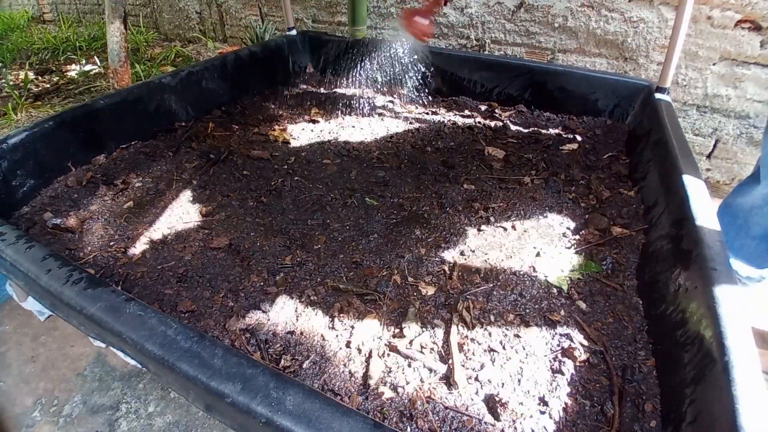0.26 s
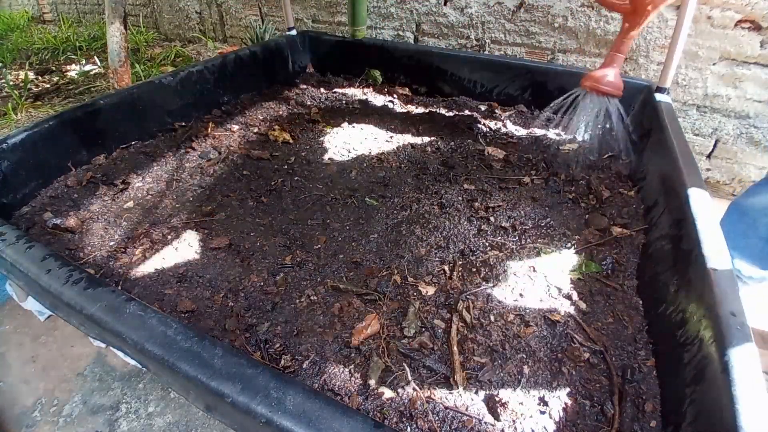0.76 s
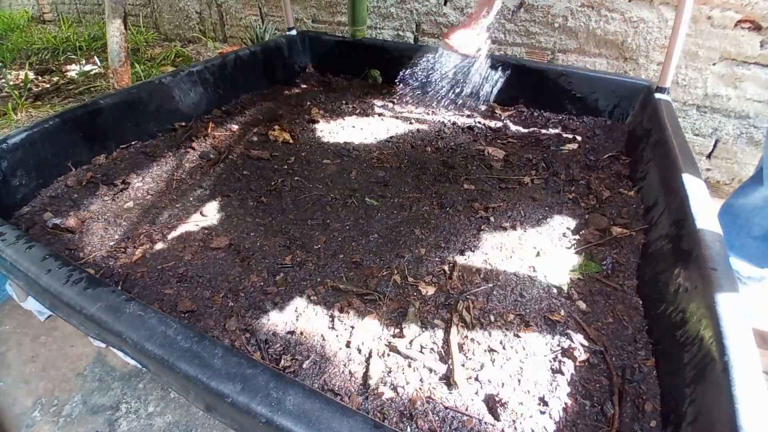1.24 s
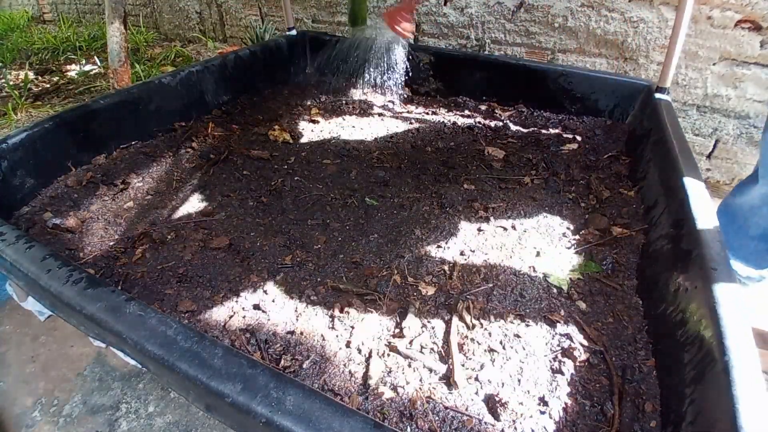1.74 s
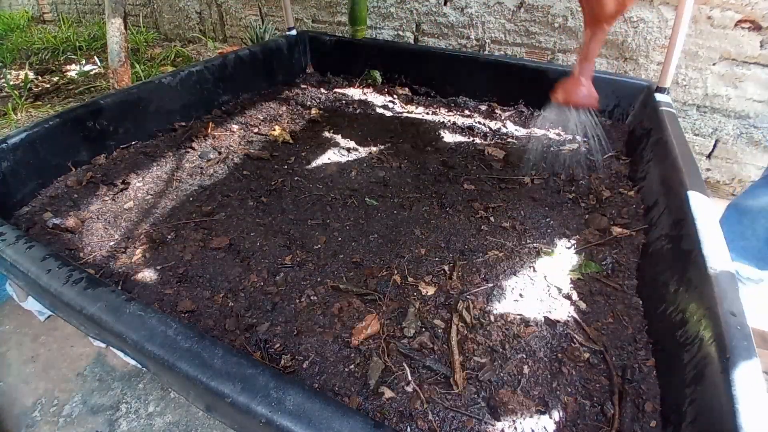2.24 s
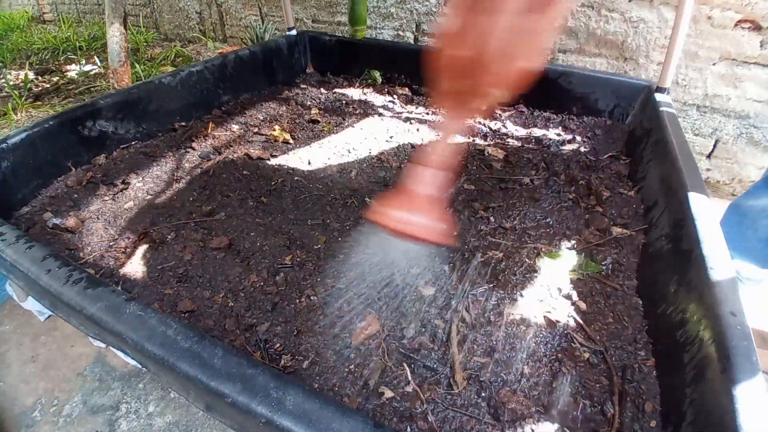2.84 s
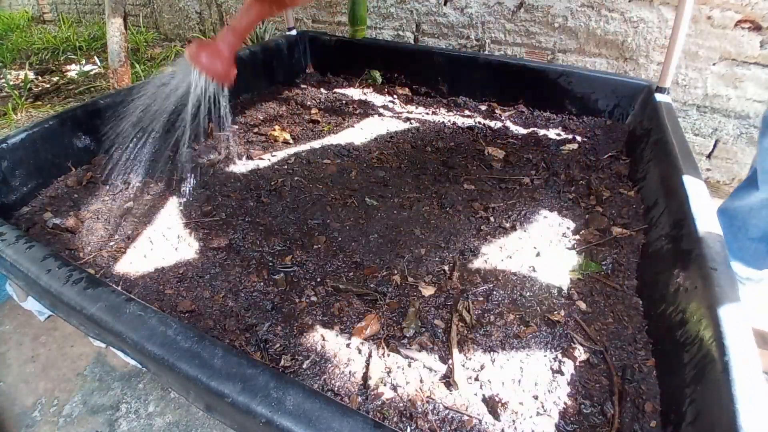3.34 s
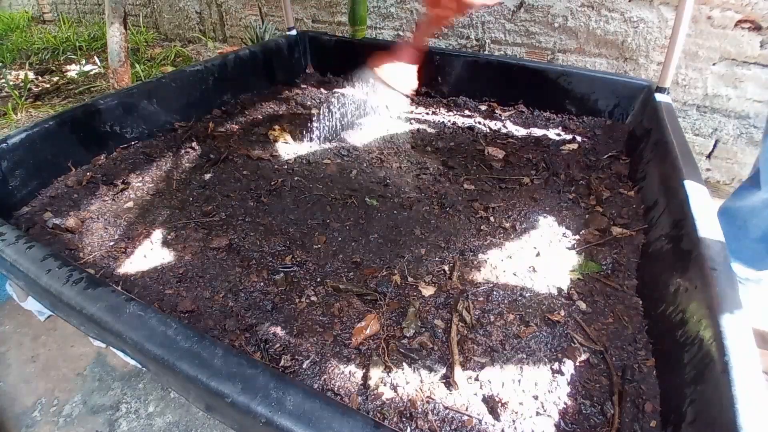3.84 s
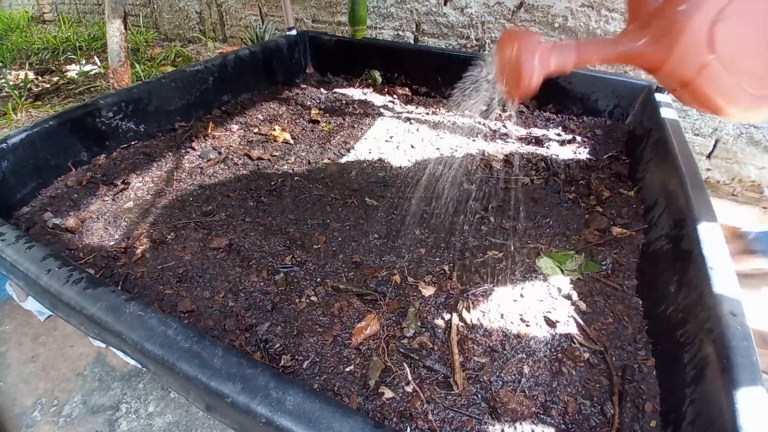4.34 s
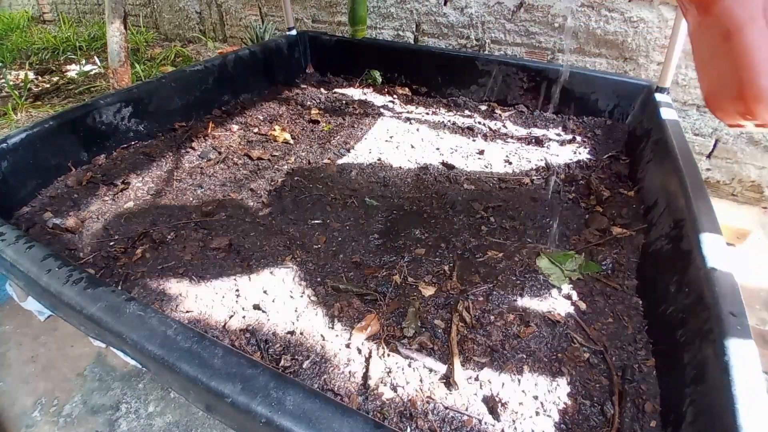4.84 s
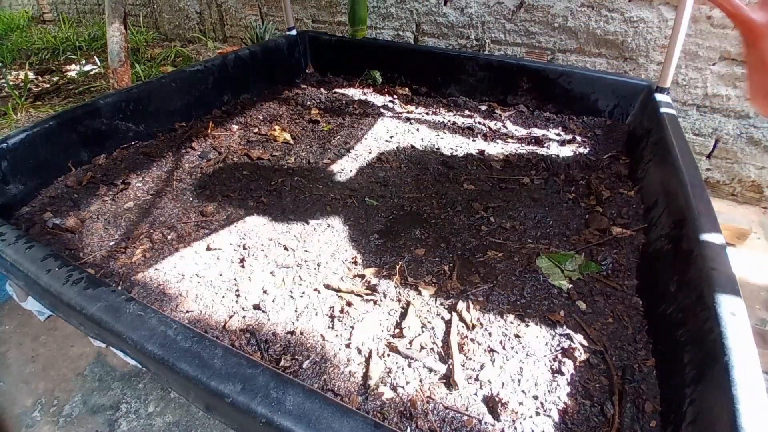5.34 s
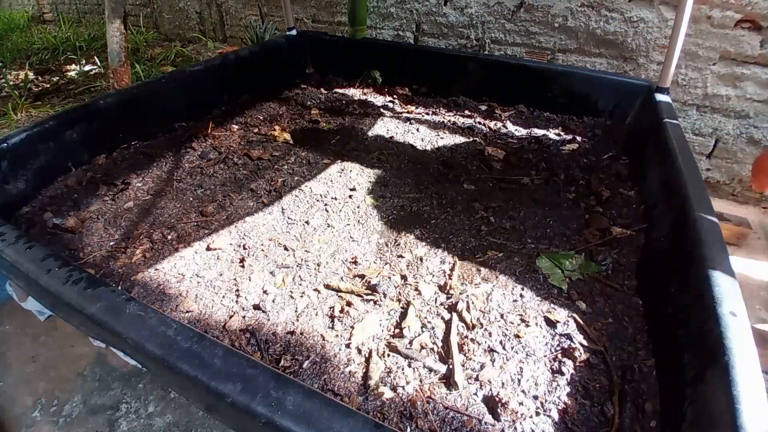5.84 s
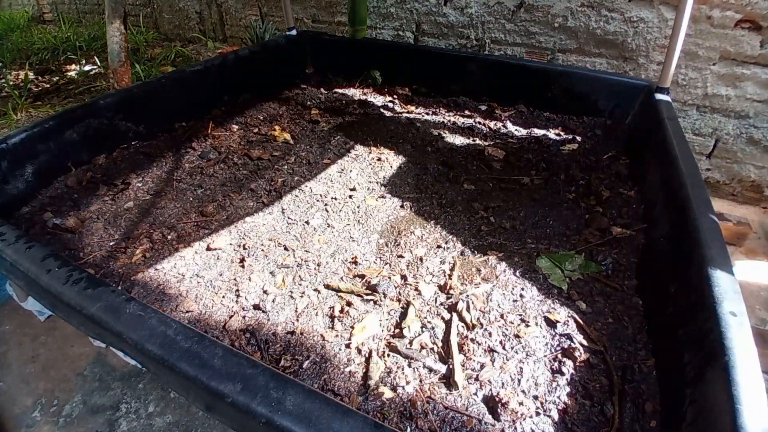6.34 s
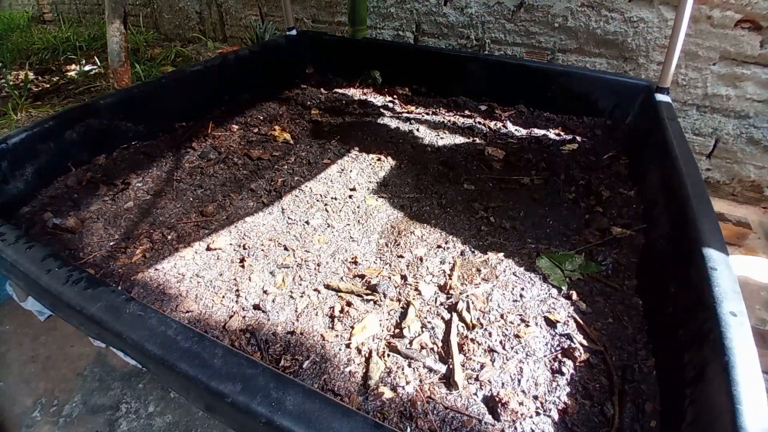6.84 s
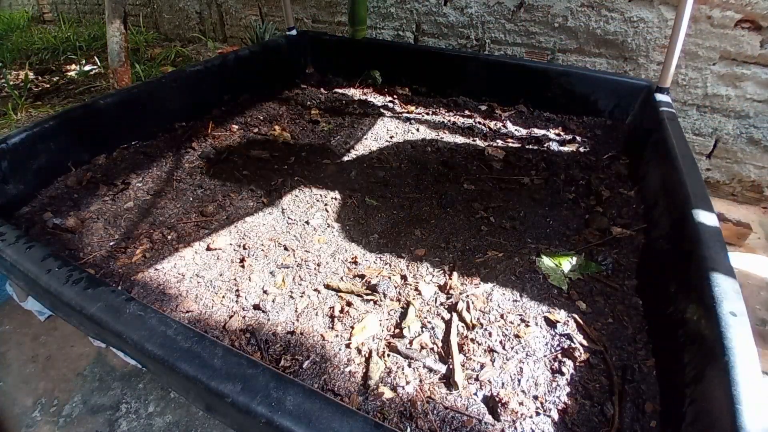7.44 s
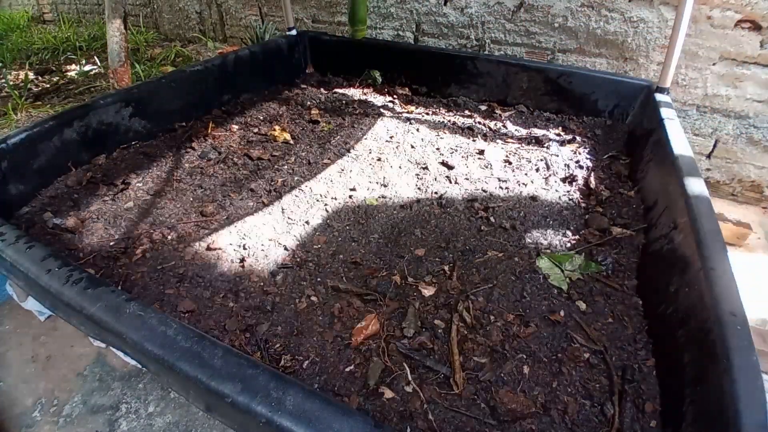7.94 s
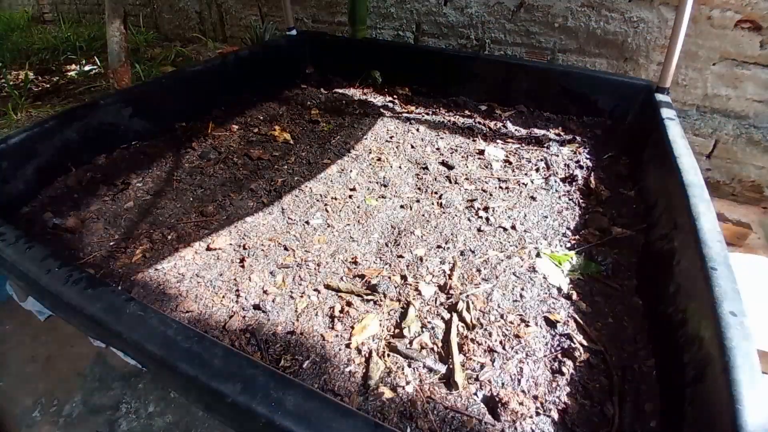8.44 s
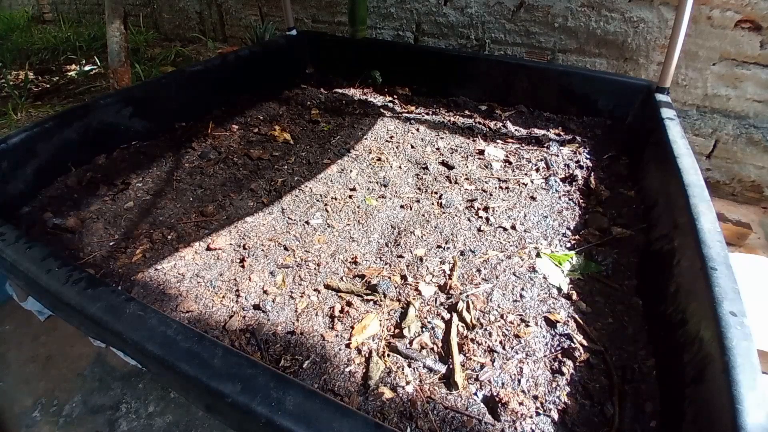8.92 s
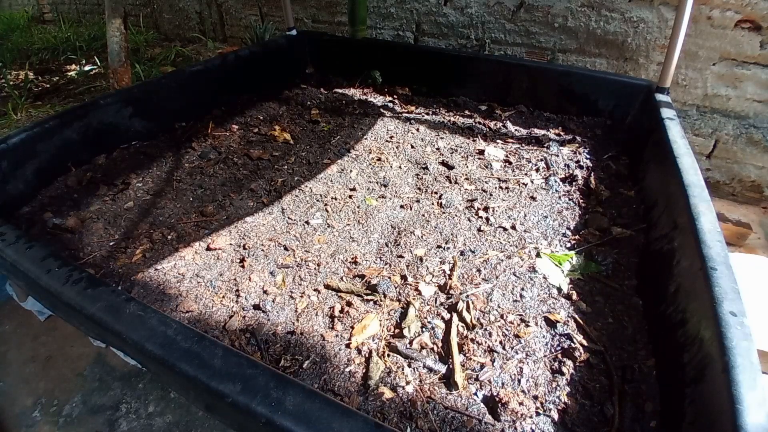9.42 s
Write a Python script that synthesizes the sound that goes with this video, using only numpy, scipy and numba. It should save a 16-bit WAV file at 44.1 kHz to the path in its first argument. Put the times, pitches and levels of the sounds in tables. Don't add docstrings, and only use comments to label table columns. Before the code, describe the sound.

Close, bright outdoor water sound: a continuous fizzy splash with fine spray sprinkling over soil. Hollow plastic thuds come early, then drops tick and bubbles squeak. The spray swells closer, swings away and returns, with knocks near the middle, then runs dry. Water keeps trickling and gurgling as the empty can is bumped and scuffed. Small nearby microphone, no bass.

```python
import sys
import numpy as np
from scipy import signal
from scipy.fft import rfft, irfft
from scipy.io import wavfile
from scipy.ndimage import uniform_filter1d
from numba import njit

SR = 44100
rng = np.random.default_rng(int(sys.argv[2]) if len(sys.argv) > 2 else 0)


def ratio_of_db(decibels):
    return 10 ** (np.asarray(decibels, float) / 20)


def generate_wav(sig):
    pcm = np.round(np.clip(np.atleast_2d(sig).T, -1, 1) * 32767).astype(np.int16)
    wavfile.write(sys.argv[1], SR, pcm)


N = 426888

# pitch_hz, level_db
HOLLOW_MODES = [(190, -24), (250, 0.5), (291, -1.5), (345, -0.5), (369, -4.5), (560, -7.5), (800, -33)]


def level(x, db):
    return x * ratio_of_db(db) / np.sqrt(np.mean(x ** 2))


def curve(s, values):
    return np.interp(np.arange(N) / SR, s, values)


def at(s):
    return (np.asarray(s) * SR).astype(np.int64)


def band(x, hz, width_hz):
    return signal.lfilter(*signal.iirpeak(hz, hz / width_hz, fs=SR), x)


def add_at(out, s, sound):
    out[at(s):at(s) + len(sound)] += sound[:N - at(s)]


def walk(rate):
    hold = int(SR / rate)
    steps = np.repeat(rng.standard_normal(N // hold + 1), hold)
    return 1.76 * uniform_filter1d(uniform_filter1d(steps, hold), hold)[:N]


@njit
def rings(start, hz, cycles, size, glide):
    out = np.zeros(N)
    for k in range(len(start)):
        n = int(cycles[k] * 2 * SR / hz[k]) + 2
        step = np.exp(2j * np.pi * hz[k] / SR - 5.76 / n)
        climb = np.exp(2j * np.pi * hz[k] * glide / SR / n)
        z = size[k] + 0j
        shut = 1.
        opening = np.exp(-25 / n)
        for i in range(start[k], min(start[k] + n, N)):
            out[i] += z.imag * (1 - shut)
            shut *= opening
            z *= step
            step *= climb
    return out


def swarm(count, lo_hz, hi_hz, cycles, scatter_db, glide):
    when, pitch, big, long = rng.random((count, 4)).T
    size = ratio_of_db(-scatter_db * np.log(1 - big + .004))
    hz = lo_hz * (hi_hz / lo_hz) ** pitch
    return level(rings(at(when * N / SR), hz, cycles * (.5 + long), size, glide), 0)


def landing(kicks, fall_s, size):
    falling = signal.lfilter([1], [1, -np.exp(-1 / (fall_s * SR))], kicks)
    return uniform_filter1d(falling, size=size)


def slops(rate, fall_s):
    kicks = (rng.random(N) < rate / SR) * rng.exponential(size=N)
    swell = np.log(landing(kicks, fall_s, size=400) + 0.21)
    swell = swell - uniform_filter1d(swell, size=3500)
    return swell / swell.std()


def swells(table, ref_db, fall_s, size=300):
    s, db = np.transpose(table)
    kicks = np.zeros(N)
    kicks[at(s)] = ratio_of_db(np.minimum(db - ref_db, 6))
    return np.log(1 + landing(kicks, fall_s, size) / 0.14)


def lulls(table):
    out = np.zeros(N)
    for s, long, db in table:
        half = at(max(0.84 * long, .016))
        dip = min(db, 0) * np.sqrt(np.hanning(2 * half))
        out[max(at(s) - half, 0):at(s) + half] += dip[max(half - at(s), 0):N - at(s) + half]
    return out


def hum():
    # start_s, peak_db
    wavers = [(0.27, -61), (0.619, -62), (0.717, -44), (0.952, -40), (1.15, -71), (1.261, -68),
              (1.754, -58), (1.933, -64), (2.29, -57), (2.399, -63), (2.715, -75), (2.873, -77),
              (3.274, -66), (3.353, -75), (3.539, -55), (3.849, -65), (3.971, -66), (4.139, -85),
              (4.489, -70), (4.809, -49), (4.939, -68), (5.167, -52), (5.413, -63), (5.591, -61),
              (5.899, -64), (6.303, -44), (6.442, -57), (6.601, -62), (6.751, -49), (6.842, -54),
              (7.181, -63), (7.3, -50), (7.409, -55), (7.569, -53), (7.919, -61), (8.123, -70),
              (8.251, -66), (9.054, -76), (9.159, -73), (9.244, -55)]
    low = band(band(rng.standard_normal(N), 184, 54), 184, 54)
    drift_db = 0.8 * walk(2.2) + 1.8 * walk(19)
    swell_db = 6.5 * swells(wavers, ref_db=-63, fall_s=0.042, size=1500)
    return level(low, -78) * ratio_of_db(drift_db + swell_db)


def hollow(x):
    return sum(ratio_of_db(db) * band(x, hz, hz / 14) for hz, db in HOLLOW_MODES)


def scuff():
    # start_s, held_s, level_db
    rubs = [(.66, .04, -46.5), (.9, .04, -49), (1.04, 0.089, -48), (1.3, 0.051, -49), (6.35, 0.074, -43.5),
            (7.15, 0.15, -46), (7.39, 0.028, -42), (7.48, 0.13, -49), (4.685, 0.025, -61),
            (4.825, 0.035, -57), (5.52, 0.023, -60)]
    rise_db_s, fall_db_s = 400, 154
    rub = level(hollow(rng.standard_normal(N) * ratio_of_db(3.5 * walk(30))), 0)
    t = np.arange(N) / SR
    gain = np.zeros(N)
    for s, held, db in rubs:
        before_s = np.clip(s - t, 0, 1)
        after_s = np.clip(t - s - held, 0, 1)
        gain += ratio_of_db(db - rise_db_s * before_s - fall_db_s * after_s)
    return rub * gain * ratio_of_db(-5.5)


def thumps():
    # start_s, peak_db, pitch_hz, ring_t60_s
    blows = [(0.045, -41.5, 403, 0.17), (0.147, -51, 465, 0.26), (0.719, -14, 267, 0.079),
             (0.737, -14, 301, 0.083), (0.835, -36, 267, .15), (0.904, -24.5, 275, 0.25),
             (0.954, -10.5, 365, 0.18), (1.05, -34, 277, 0.3), (1.15, -46, 258, .1),
             (1.649, -39.5, 410, 0.088), (2.599, -47.5, 374, 0.23), (2.977, -38, 326, 0.11),
             (3.545, -45, 188, 0.24), (4.461, -40.5, 380, 0.13), (4.682, -51, 424, 0.32),
             (4.811, -35, 478, 0.16), (4.812, -29, 230, .05), (5.506, -43, 300, 0.16),
             (6.049, -48, 268, 0.2), (6.306, -22, 265, 0.12), (6.308, -11, 358, 0.18),
             (6.6, -42, 198, 0.21), (6.745, -28.5, 281, 0.35), (6.859, -32, 284, 0.22),
             (6.904, -43, 260, 0.17), (7.049, -44.5, 301, 0.45), (7.189, -36, 250, 0.14),
             (7.246, -37, 287, 0.16), (7.33, -23, 274, 0.14), (7.405, -27, 314, 0.18),
             (7.48, -39, 283, 0.17), (7.567, -35, 194, 0.095), (9.418, -44, 305, 0.26)]
    # start_s, peak_db, pitch_hz, ring_t60_s
    footfalls = [
        (6.751, -49, 111, 0.21),
        (7.171, -44, 110, 0.38),
        (9.055, -42, 170, 0.055),
    ]
    out = np.zeros(N)
    t = np.arange(int(.5 * SR)) / SR
    for s, db, hz, t60 in blows + footfalls:
        phases = 1.43 * rng.random(len(HOLLOW_MODES) + 1)
        modes = [(hz, 2.5)] + [(f, g - 9 * abs(np.log2(f / hz))) for f, g in HOLLOW_MODES]
        ring = sum(ratio_of_db(g) * np.sin(2 * np.pi * f * t + p) for (f, g), p in zip(modes, phases))
        ring = ring / np.abs(ring).max() * ratio_of_db(-60 * t / max(t60, .03))
        shudder = level(band(band(rng.standard_normal(len(t)), 290, 110), 290, 110), -19.0)
        shudder = shudder * ratio_of_db(-60 * t / 0.24)
        soft_onset = (1 - np.exp(-t * hz / 0.9)) ** 2
        add_at(out, s, (ring + shudder) * soft_onset * ratio_of_db(db))
    return out


def raps():
    # start_s, peak_db, centre_hz, rattle_s
    knocks = [(.953, -17, 980, 0.0088), (4.442, -24, 1370, .002), (4.444, -16, 1380, 0.0078),
              (4.677, -34, 520, 0.031), (4.715, -37, 900, 0.012), (4.812, -15, 750, 0.00043),
              (4.819, -35, 650, 0.028), (5.505, -40, 547, 0.028), (7.533, -30, 1700, 0.028),
              (9.48, -43, 1050, 0.12), (7.955, -37.5, 794, 0.044), (.13, -47, 500, .02)]
    # pitch_hz, level_db, ring_t60_s
    wall = [(423, 6.5, 0.093), (664, 5.5, 0.049), (803, 1.5, 0.19), (1050, 0.5, 0.038), (1247, 4, 0.13),
            (1570, 0, 0.24), (1860, 6, 0.05), (2090, -12, 0.3), (2560, -32.5, 0.049)]
    out = np.zeros(N)
    t = np.arange(int(.15 * SR)) / SR
    for s, db, hz, rattle in knocks:
        contact = np.exp(-t / max(rattle, .0005)) + .04 * np.exp(-t / .03)
        force = band(rng.standard_normal(len(t)) * contact, hz, 1.3 * hz)
        force = band(force, hz, 1.4 * hz)
        ring = sum(ratio_of_db(g) * band(force, f, 5.7 / t60) * t60 ** .5 for f, g, t60 in wall)
        direct = band(force, hz, 1.2 * hz) / np.abs(force).max()
        add_at(out, s, (ring / np.abs(ring).max() + .8 * direct) * ratio_of_db(db - 6.0))
    return out


def ticks():
    # start_s, peak_db, top_db above the peak, low_crack_db above the peak
    drops = [(1.2726, -27, -17, -3), (1.3525, -23.5, -17, -21), (1.355, -24, -19, -15),
             (1.393, -24, -21, -20), (1.3955, -36, -19, -20), (1.516, -30, -25, -21),
             (1.957, -17.5, -20, -24), (1.969, -25, -10, -12), (2.129, -25, -26, -30),
             (2.356, -32, -22, -11), (2.5745, -30, -8, -21), (2.583, -32, -12, -21), (2.933, -20, -15, 0.5),
             (2.9415, -36, -7, -20), (2.952, -35, -6, -20), (2.9555, -37, -6, -20), (2.9618, -34, -10, -20),
             (2.9781, -21, -9, -7), (3.9366, -31, -16, -23), (4.4053, -30, -12, -10),
             (4.605, -30, -18, -11), (4.7416, -27, -20, -19), (4.826, -27, -13, -7),
             (4.8694, -24, -23, -22), (4.8989, -23, -28, -16), (4.924, -28, -16, -9), (4.9467, -35, -3, -6),
             (7.5339, -30, -18, 4.5), (8.955, -27, -26, -15)]
    out = np.zeros(N)
    t = np.arange(int(.03 * SR)) / SR
    spatter = np.exp(-t / 0.0015) + .07 * np.exp(-t / .005)
    for s, db, top_db, low_db in drops:
        burst = rng.standard_normal(len(t)) * spatter
        burst[0] += 1.5
        tick = 0
        for hz, width_hz, part_db in ((7500, 10700, -0.41), (13600, 9200, top_db + 13), (3240, 3000, low_db + 2.5)):
            part = band(band(burst, hz, width_hz), hz, width_hz)
            tick = tick + ratio_of_db(part_db) * part / np.abs(part).max()
        add_at(out, s, tick * ratio_of_db(db))
    return out


def plops():
    # start_s, peak_db, pitch_hz, length_cycles
    large = [(1.02, -28, 2300, 16), (1.2725, -29, 2120, 13), (3.9664, -26.5, 2060, 18),
             (4.2404, -32, 1900, 14), (5.043, -31, 1660, 16), (5.3767, -28, 1810, 21),
             (5.624, -30, 1640, 18), (6.109, -29, 1640, 21), (6.205, -28, 1670, 15),
             (6.4423, -30, 2090, 16), (6.804, -26.5, 1660, 29), (6.9494, -27, 1730, 12),
             (7.5847, -30.5, 2090, 85), (8.239, -31, 1770, 21), (8.6293, -28, 2290, 12),
             (9.133, -29, 1860, 16), (9.14, -32, 1640, 15), (9.15, -31, 2050, 14), (8.636, -27, 2230, 14),
             (8.642, -29, 2560, 16), (2.672, -39, 1700, 20)]
    # start_s, peak_db, pitch_hz, length_cycles
    squeaky = [
        (1.227, -27, 3240, 28),
        (1.234, -23, 2900, 12),
        (1.243, -26, 3040, 13),
        (1.258, -26, 2610, 17),
        (1.3641, -14.5, 3760, 4.8),
        (1.8078, -27, 4650, 18),
        (1.915, -29, 5600, 12),
        (2.5735, -20, 10600, 40),
        (2.9, -28, 3140, 12),
        (5.564, -29.5, 4360, 30),
    ]
    # start_s, peak_db, pitch_hz, length_cycles
    deep = [(0.056, -47, 1200, 13), (0.145, -43.5, 539, 29), (.17, -43, 456, 18), (.06, -48, 557, 14),
            (0.573, -35, 1103, 37), (0.629, -33, 1210, 15), (1.305, -30, 1200, 11),
            (1.575, -27.5, 1300, 5.1), (1.773, -41.5, 595, 20), (1.844, -27, 980, 21),
            (1.857, -27.5, 1020, 13), (1.875, -35, 900, 20), (2.982, -37, 1220, 22), (3.419, -46, 1230, 23),
            (4.323, -31.5, 1310, 22), (4.719, -38, 510, 9.4), (4.849, -41, 770, 13), (5.717, -35, 1310, 15),
            (5.849, -38, 1280, 14), (7.269, -40, 1300, 16), (7.673, -42, 1050, 25), (7.948, -40, 1230, 14),
            (7.998, -42, 880, 28), (8.039, -33, 1330, 9.6), (8.56, -36, 600, 10), (8.619, -39, 870, 24),
            (8.714, -41, 1170, 14), (9.466, -45, 1140, 25), (9.482, -38, 1050, 21), (9.497, -33, 1004, 17),
            (9.506, -34, 1150, 18), (9.512, -30, 1000, 16), (9.5, -48, 600, 29), (9.548, -42.5, 606, 12),
            (8.72, -46, 470, 7.2), (8.975, -51, 550, 16), (4.72, -37, 704, 6.3), (2.906, -35, 990, 15),
            (5.537, -46, 800, 4.1)]
    s, db, hz, cycles = np.transpose(large + squeaky + deep)
    return rings(at(s), hz, np.maximum(cycles, 1), ratio_of_db(db + 0.5), 0.02)


def spray_db():
    # start_s, level_db against the stream's mist
    swing = [
        (0, 4),
        (.65, 2),
        (1.35, 6.5),
        (1.65, 3.5),
        (2.35, 8.5),
        (2.9, 11),
        (3.4, -1.5),
        (4.95, 9),
        (5.15, -20),
    ]
    return curve(*np.transpose(swing))


def patter():
    drops = swarm(count=2500, lo_hz=6400, hi_hz=15400, cycles=3.8, scatter_db=3.5, glide=.05)
    return drops * ratio_of_db(-62.5 + spray_db())


def surges():
    # start_s, level_db
    churning = [(0.0, -51), (1.05, -52.5), (1.21, -53), (1.56, -53), (2.61, -57.5), (2.91, -52.5),
                (3.21, -53), (5.63, -52.5), (6.17, -58), (6.79, -55), (7.12, -55.5), (7.39, -56),
                (8.33, -56), (8.68, -54.5), (9.19, -61.5), (9.68, -51.5)]
    # start_s, peak_db
    clear_slops = [
        (3.3194, -26),
        (3.7369, -31),
        (3.9365, -10),
        (4.1494, -58),
        (4.2517, -27),
        (4.6994, -27),
                   (5.0293, -47), (5.0841, -38), (5.2318, -53), (5.2942, -51), (5.3391, -43), (5.4024, -40),
                  (5.6304, -47), (5.7396, -64), (5.8978, -33), (5.9836, -33), (6.0484, -54), (6.1113, -29),
                  (6.2415, -29), (6.3423, -29), (6.4181, -26), (6.5598, -32), (6.6591, -28), (6.7918, -47),
                  (6.8446, -47), (6.9215, -44), (6.9768, -54), (7.0153, -28), (7.0706, -50), (7.1105, -49),
                  (7.1983, -49), (7.2542, -39), (7.348, -61), (7.3959, -49), (7.5316, -32), (7.6304, -44),
                  (7.7216, -61), (7.781, -52), (7.8134, -51), (7.8928, -27), (7.9421, -23), (8.012, -29),
                  (8.1093, -49), (8.2759, -52), (8.4475, -54), (8.6241, -61), (8.7663, -30), (8.8526, -41),
                  (8.9543, -46), (8.9828, -30), (9.0546, -36), (9.1399, -54), (9.2547, -58), (9.3854, -56),
                  (9.4567, -60)]
    # start_s, peak_db
    gulps = [(0.241, -42), (0.574, -52), (0.76, -55), (1.169, -48), (1.304, -32), (1.362, -44),
             (1.552, -32), (1.844, -32), (1.897, -26), (2.16, -29), (2.229, -58), (2.54, -31), (2.746, -42),
             (2.819, -46), (2.907, -29), (3.007, -40), (3.273, -51), (3.421, -29), (3.549, -41),
             (3.662, -51), (3.903, -58), (4.019, -62), (4.131, -57), (4.324, -45), (5.035, -40),
             (5.169, -40), (5.373, -30), (5.519, -38), (5.79, -41), (6.16, -40), (6.313, -35), (6.597, -63),
             (6.985, -48), (7.543, -45), (7.675, -38), (7.92, -43), (7.98, -29), (8.305, -37), (8.676, -49),
             (8.85, -50), (8.952, -39), (9.217, -32), (9.484, -31)]
    # middle_s, length_s, level_db
    treble_dips = [(0.127, 0.046, -10), (0.279, 0.046, -4), (0.347, 0.02, -9), (0.838, 0.053, -6),
                   (1.045, 0.031, -7), (1.088, 0.003, -2), (1.522, 0.04, -15), (1.619, 0.023, -10),
                   (1.739, 0.002, -8), (1.783, 0.105, -2.5), (2.04, 0.06, -6), (2.145, 0.15, -2),
                   (2.923, 0.014, -18), (3.225, 0.07, 2), (3.395, 0.09, -4.5), (3.677, 0.045, -7),
                   (3.789, 0.15, -4), (4.086, 0.053, -6), (4.23, 0.064, -8), (4.422, 0.028, -12),
                   (4.649, 0.077, -7), (4.789, 0.031, -8), (4.861, 0.025, -17), (5.186, 0.007, 4),
                   (5.223, 0.119, -1), (5.283, 0.022, -11), (5.537, 0.04, -6), (5.592, 0.034, -2),
                   (5.692, 0.07, -6), (5.869, 0.049, -8), (5.974, 0.022, -10), (6.211, 0.044, -4),
                   (6.278, 0.012, -4), (6.326, 0.077, -4), (6.405, 0.028, -5), (6.543, 0.049, 2),
                   (6.632, 0.029, -10), (6.775, 0.044, -2), (6.909, 0.015, -13), (6.954, 0.032, -1),
                   (6.994, 0.136, -4), (7.179, 0.066, 1), (7.241, 0.026, -8), (7.615, 0.048, 0),
                   (7.762, 0.065, -7), (7.867, 0.055, -10), (7.929, 0.017, -5), (8.251, 0.027, -11),
                   (8.301, 0.031, -3), (8.421, 0.078, -6), (8.89, 0.078, -5), (8.937, 0.02, -8),
                   (8.975, 0.015, -14), (9.129, 0.035, -12), (9.222, 0.043, -5), (9.309, 0.052, -7),
                   (9.374, 0.013, -16), (9.439, 0.043, -11)]
    # middle_s, length_s, level_db
    gurgle_lulls = [(0.192, 0.11, 1), (0.299, 0.14, -10.5), (0.905, 0.082, -10.5), (1.217, 0.061, -11.5),
                    (1.514, 0.033, -6), (1.629, 0.045, -8.5), (1.754, 0.12, -5), (2.13, 0.039, -3),
                    (2.397, 0.004, -10), (2.507, 0.17, -3), (3.103, 0.009, 2), (3.23, 0.079, -5.5),
                    (3.377, 0.071, -6), (3.624, 0.073, -4.5), (3.866, 0.16, -7.5), (4.283, 0.19, -7),
                    (4.634, 0.069, -4), (4.767, 0.055, -9), (5.091, 0.092, -4.5), (5.233, 0.12, -6.5),
                    (5.602, 0.056, -9), (5.887, 0.03, -7), (6.016, 0.15, -1.5), (6.276, 0.037, -12),
                    (6.383, 0.038, -5), (6.53, 0.071, -2), (6.952, 0.046, -2), (7.119, 0.057, -15),
                    (7.78, 0.055, -7), (7.887, 0.029, -4), (8.271, 0.067, -9), (8.388, 0.049, -9),
                    (8.543, 0.037, -4), (8.768, 0.04, 3), (9.122, 0.12, -3), (9.291, 0.041, -5)]
    churn_share = (0.81, 0.13, 0.23, 0.5)
    spray_level_db = (-30, -24, -12.5, -2.5)
    clear_slop_db = (.3, .6, 1.6, 2.5)
    small_slop_db = (0.85, 0.9, 0.6, 0.6)
    treble_dip_share, gurgle_lull_share = (0, .1, .25, 1.3), (0.69, 0.077, 0.014, 0.11)

    churn_db = curve(*np.transpose(churning))
    stream_db = np.outer(churn_share, churn_db - churn_db.mean())
    stream_db += np.outer(clear_slop_db, swells(clear_slops, ref_db=-33, fall_s=0.019))
    stream_db += np.outer(small_slop_db, slops(rate=24, fall_s=0.086))
    stream_db[0] += .5 * walk(11.0) + 2.5 * swells(gulps, ref_db=-40, fall_s=0.029, size=900)
    can_db = np.add.outer(spray_level_db, spray_db())
    gain = np.sqrt(ratio_of_db(stream_db) ** 2 + ratio_of_db(can_db) ** 2)
    lull_db = np.outer(treble_dip_share, lulls(treble_dips)) + np.outer(gurgle_lull_share, lulls(gurgle_lulls))
    gain = gain * ratio_of_db(lull_db)
    return gain / np.exp(np.log(gain).mean(axis=1, keepdims=True))


def splash():
    # centre_hz, size (0 gurgle, 1 fizz, 2 hiss, 3 mist)
    drop_sizes = [(1200, 0), (1800, 1), (4500, 1), (7000, 2), (10600, 2), (12200, 3)]
    # pitch_hz, level_db per Hz
    water = [(60, -30), (130, -16.5), (200, -27.5), (400, -17.5), (700, -20.5), (1000, -9), (1400, -4.5),
             (1750, 0.5), (2300, -3), (3300, -3.5), (4800, -5.5), (6200, -13.5), (10000, -13), (15500, -16)]
    # pitch_hz, width_hz, level_db
    vessel = [(584, 51, 10), (876, 49, 9), (1068, 20, 5), (1187, 29, 9), (1660, 39, 4), (2110, 29, 7),
              (2290, 110, 5), (3230, 200, 3.5)]
    patch_db = (1.75, 0.89, 1.05, 0.59)

    bubbles = swarm(count=5000, lo_hz=250, hi_hz=2526, cycles=31.3, scatter_db=2.0, glide=0.068)
    pinging = swarm(count=9000, lo_hz=2398, hi_hz=14930, cycles=132.0, scatter_db=1.4, glide=0.019)
    fizz = swarm(count=30000, lo_hz=1200, hi_hz=14760, cycles=5.15, scatter_db=1.5, glide=0.17)
    far_drops = rng.standard_normal(N)
    mix = ratio_of_db(-5.5) * bubbles + ratio_of_db(-7.5) * pinging + ratio_of_db(-8.5) * fizz + ratio_of_db(-1.5) * far_drops

    octave = np.log2(np.arange(N // 2 + 1) * SR / N + 1)
    lines = rfft(mix)
    flat = lines / np.sqrt(uniform_filter1d(np.abs(lines) ** 2, size=3000))
    water_hz, water_db = np.transpose(water)
    colour_db = np.interp(octave, np.log2(water_hz), water_db)
    for hz, width_hz, db in vessel:
        colour_db = colour_db + db / (1 + (2 * (2 ** octave - hz) / width_hz) ** 2)
    lines = rfft(level(irfft(flat * ratio_of_db(colour_db), N), -41))

    gain = surges()
    edge_hz, size = np.transpose(drop_sizes)
    centres = np.append(np.arange(8, 13.2, 1 / 3), np.log2([11000, 12000, 14000, 16000]))
    out = 0
    for k, centre in enumerate(centres):
        share = np.interp(octave, centres, np.arange(len(centres)) == k)
        blend = np.array([np.interp(centre, np.log2(edge_hz), size == row) for row in range(4)])
        patches = ratio_of_db(blend @ patch_db * walk(14))
        out = out + irfft(lines * share, N) * (blend @ gain) * patches
    return out


def scene():
    near = thumps() + raps() + plops() + ticks()
    echo = ratio_of_db(-20.5) * np.roll(near, at(.009))
    return (splash() + patter() + hum() + scuff() + near + echo)[None, :]


def low_pass(x):
    return signal.sosfilt(signal.butter(12, 17010, fs=SR, output="sos"), x)


def record(dry):
    capsule_hz, capsule_width_hz, capsule_db = 8076, 1054, 13.5
    bright = dry + (ratio_of_db(capsule_db) - 1) * band(dry, capsule_hz, capsule_width_hz)
    thin = signal.sosfilt(signal.butter(4, 140, "high", fs=SR, output="sos"), bright)
    circuit = level(band(rng.standard_normal(N), 40, 200) * ratio_of_db(2.5 * walk(5)), -87.0)
    dull = signal.sosfilt(signal.ellip(14, .2, 70, 15820, fs=SR, output="sos"), thin + circuit)
    return low_pass(dull)


dry = scene()
out = record(dry)
generate_wav(out)
```